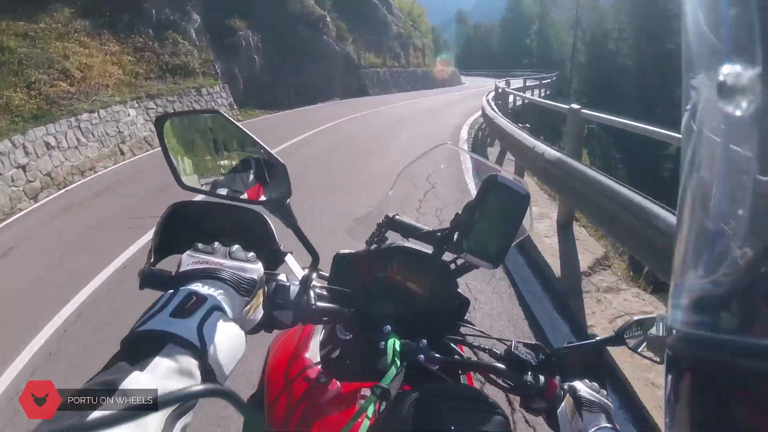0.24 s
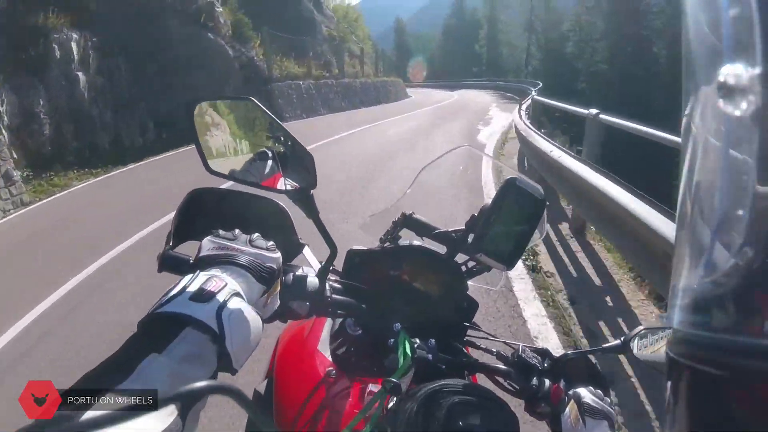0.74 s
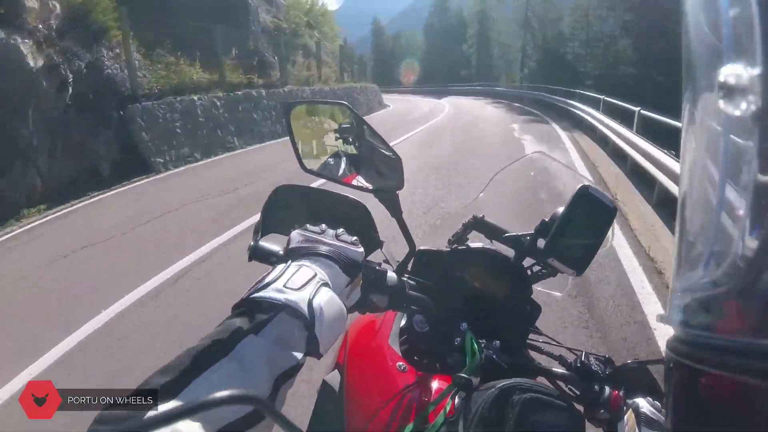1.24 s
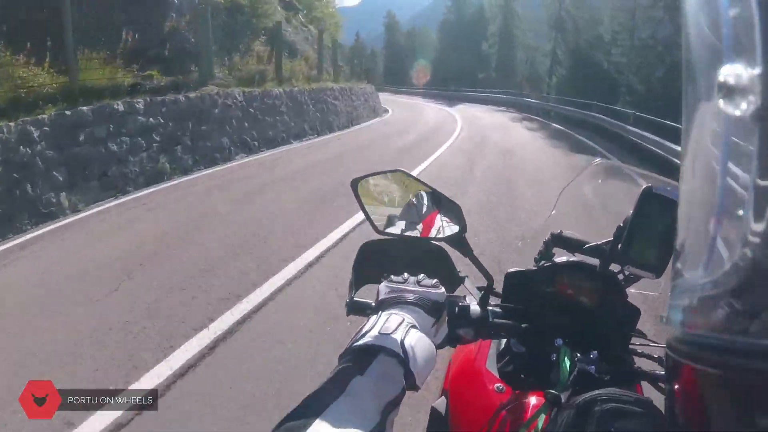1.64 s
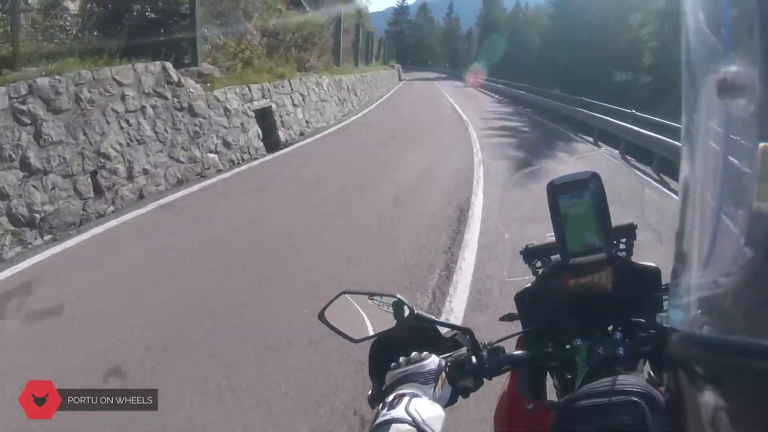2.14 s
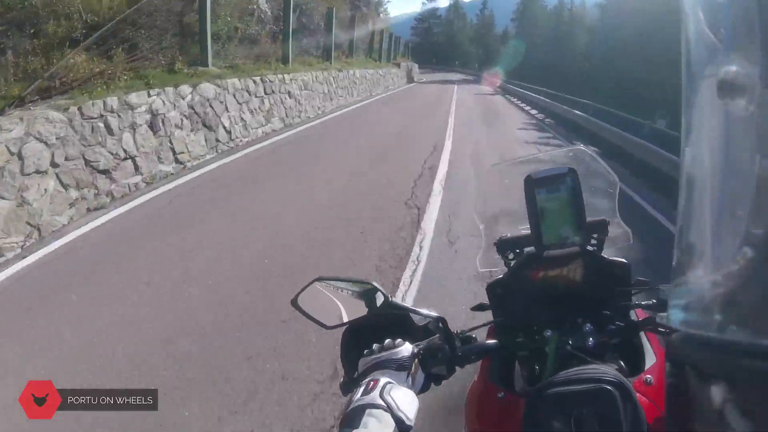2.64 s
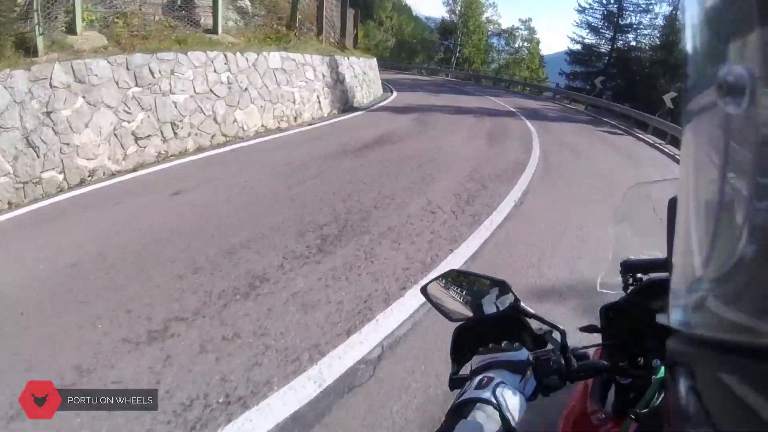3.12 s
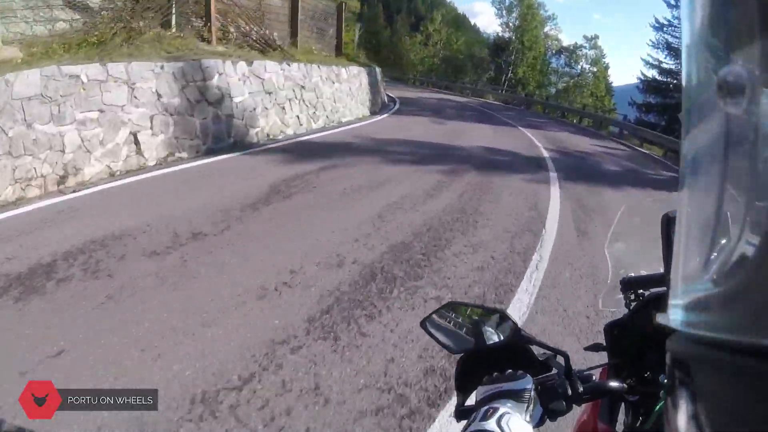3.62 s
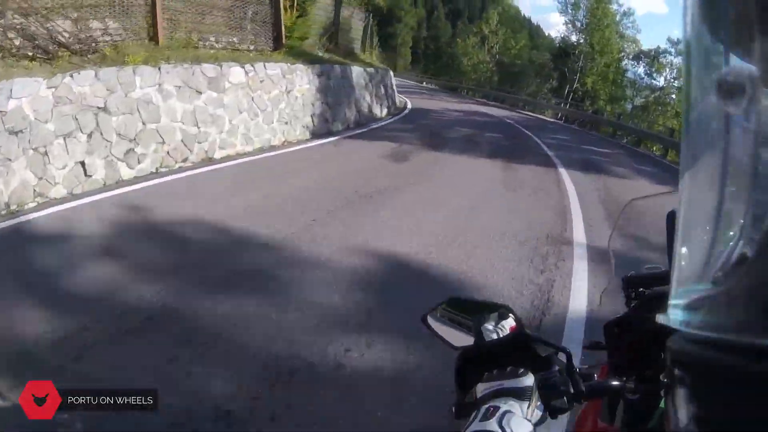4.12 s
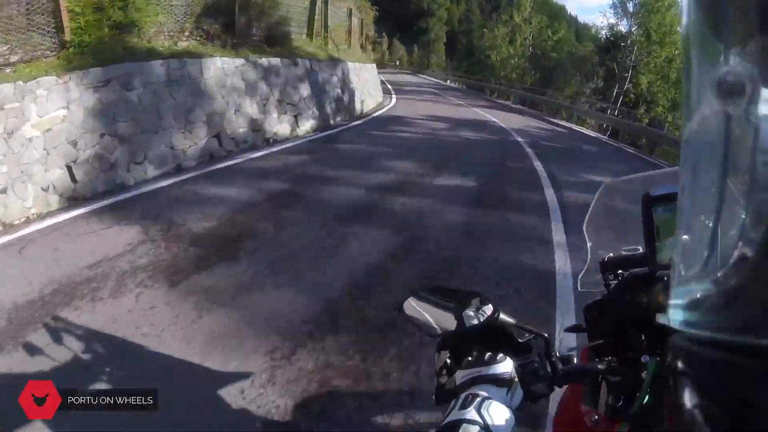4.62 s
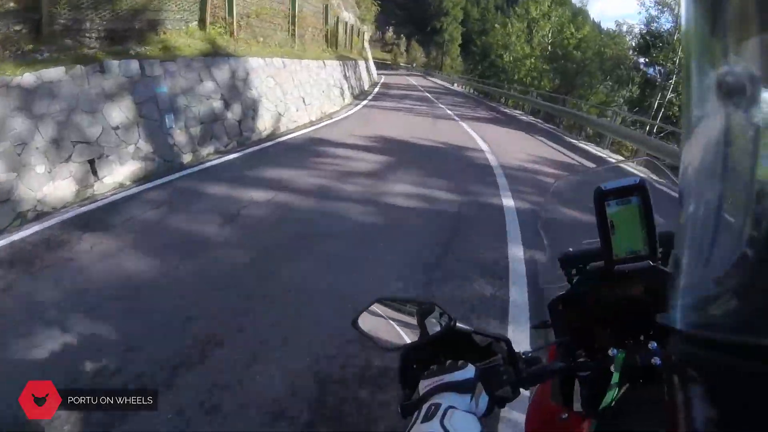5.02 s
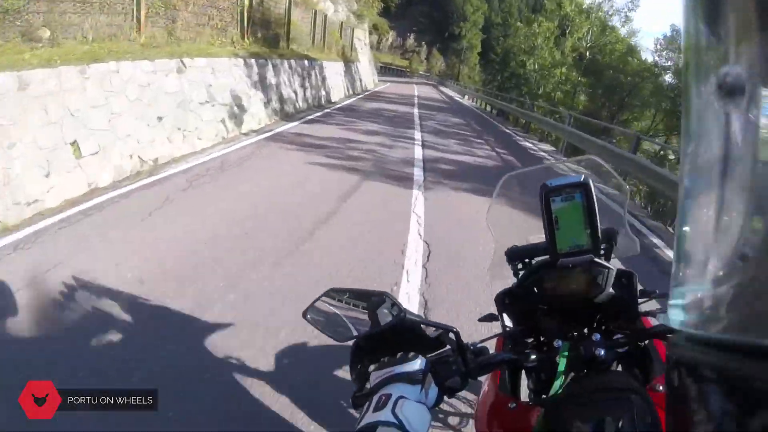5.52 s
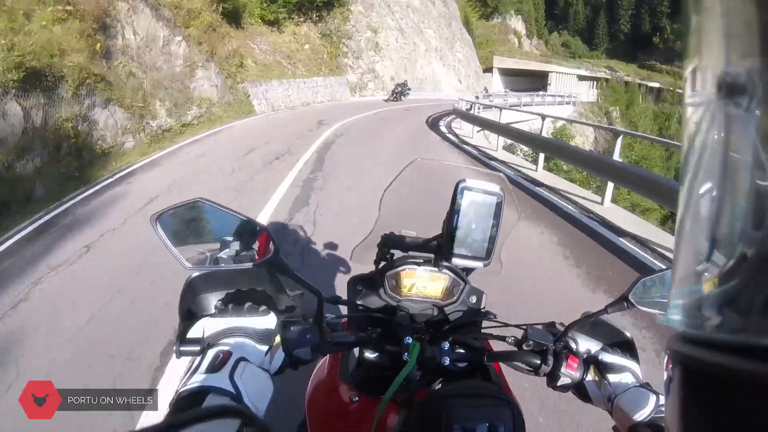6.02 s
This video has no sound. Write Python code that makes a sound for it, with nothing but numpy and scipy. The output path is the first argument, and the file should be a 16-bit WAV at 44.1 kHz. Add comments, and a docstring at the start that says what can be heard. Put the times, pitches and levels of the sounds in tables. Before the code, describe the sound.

A close, bass-heavy, muffled microphone on the rider hears a twin-cylinder motorcycle on an open mountain road. At 0 s the exhaust burbles low and uneven, with a heavy thump near 0.1 s and small bright ticks at about 0.3 and 0.8 s. From 0.5 s it smooths into a booming drone, growing raspier toward 1.6 s, then loosening. A cut at 1.9 s jumps to higher revs: popping firings, then raspy acceleration, a wind gust around 2.4 s, and lumpy deceleration pops from 2.7 s. After the cut at 2.95 s, a strong pop leads into steady droning with barking edge, faint wavering gear whine and wind swelling near 4 s; isolated pops come around 5 s as revs climb. At 5.7 s the engine abruptly drops to a deep, loping burble with irregular pops, quick ticks near 6.05 s and a faint closing hiss, ending mid-ride around 6.2 s.

```python
"""The uneven booming of a twin-cylinder motorcycle on a mountain road, from a muffled microphone on the rider.
Firings and turbulent gas ring the exhaust's boom, drone, bark, throat and rasp; strong single firings stand out.
Wind noise rumbles and buffets at the microphone port, noise bands hiss for the valve gear, gear tones whine
and bright bursts tick close by. The ride is cut in four stretches; the wave jumps at each cut."""
import sys
import numpy as np
from scipy import signal
from scipy.io import wavfile
from scipy.ndimage import uniform_filter1d

SR = 44100
rng = np.random.default_rng(int(sys.argv[2]) if len(sys.argv) > 2 else 0)


def materialize(psi):
    """Save the field psi as 16-bit PCM at rate SR to the path in sys.argv[1].

    A 1-D psi becomes a single channel; in a 2-D psi each row is a channel.
    """
    bounded = np.clip(np.atleast_2d(psi).T, -1, 1)
    quanta = np.round(bounded * 32767).astype(np.int16)
    wavfile.write(sys.argv[1], SR, quanta)


N = 276066


def from_db(db):
    """Decibels to gain."""
    return 10 ** (np.asarray(db) / 20)


def rms_one(x):
    """Scaled to rms 1."""
    return x / np.sqrt(np.mean(x ** 2) + 1e-20)


def evened(x, seconds=0.15):
    """Running rms held at 1, so that a level curve alone sets the loudness."""
    return x / np.sqrt(uniform_filter1d(x ** 2, int(seconds * SR)) + 1e-20)


def drift(rate_hz):
    """Slow random wander of spread 1: noise through a two-pole low-pass, drawn at every 40th sample."""
    r = np.exp(-80 * np.pi * rate_hz / SR)
    noise = rng.standard_normal(N // 40 + 2002)
    slow = signal.lfilter([1], [1, -2 * r, r * r], noise)[2000:]
    return np.interp(np.arange(N) / 40, np.arange(len(slow)), rms_one(slow))


def resonate(x, modes, order=2):
    """Parallel resonances with alternating signs, each passed `order` times for dark valleys."""
    out = 0
    for k, (hz, width_hz, db) in enumerate(modes):
        r, y = np.exp(-np.pi * width_hz / SR), x + 1e-18
        zeros = np.array([1, 0, -1]) * (1 - r * r) / 2
        poles = [1, -2 * r * np.cos(2 * np.pi * hz / SR), r * r]
        for _ in range(order):
            y = signal.lfilter(zeros, poles, y)
        out = out + (-1) ** k * from_db(db) * y
    return out


def banded_noise(spectrum, patchy_db):
    """Third-octave bands of noise, each with its own level and flicker; rms 1."""
    hz, db = np.transpose(spectrum)
    edges = hz[0] * 2 ** np.arange(0, np.log2(hz[-1] / hz[0]), 1 / 3)
    out, together, white = 0, drift(2.5), rng.standard_normal((2, N))
    for k, (low, high) in enumerate(zip(edges, edges[1:])):
        sos = signal.butter(2, [low, high], "band", fs=SR, output="sos")
        band = signal.sosfilt(sos, white[k % 2])
        level_db = np.interp(np.log(low * high) / 2, np.log(hz), db)
        flicker_db = patchy_db * (0.076 * together + drift(19))
        out = out + from_db(level_db + flicker_db) * band
    return rms_one(out)


# Where one stretch of the ride meets the next. Each row: time in seconds, jump of the wave (-1 to 1).
JOINS = [(1.8696, -.1), (2.9496, .24), (5.6896, .07)]


def joins():
    """At a cut the wave jumps at once and settles within a few milliseconds."""
    steps = np.zeros(N)
    for s, jump in JOINS:
        steps[round(s * SR)] = jump
    return signal.lfilter([1], [1, -np.exp(-1 / (.0015 * SR))], steps + 1e-18)


def stretch_numbers():
    """Which stretch of the ride each sample belongs to, from 0."""
    return np.searchsorted([s for s, jump in JOINS], np.arange(N) / SR)


def by_stretch(rows):
    """Each row holds from one join to the next."""
    return np.array(rows)[stretch_numbers()].T


def in_time(tables):
    """Each table's columns are drawn as lines in time, from one join to the next."""
    t, stretch = np.arange(N) / SR, stretch_numbers()
    out = np.zeros((len(tables[0][0]) - 1, N))
    for k, rows in enumerate(tables):
        here = stretch == k
        s, *columns = np.transpose(rows)
        out[:, here] = [np.interp(t[here], s, c) for c in columns]
    return out


def side_hiss():
    """Faint band of noise, opposite in the two channels."""
    sos = signal.butter(6, [4000, 11500], "band", fs=SR, output="sos")
    hiss = signal.sosfilt(sos, rng.standard_normal(N))
    return from_db(-83.5) * rms_one(hiss) * np.array([[1], [-1]])


# Broad band of the closing hiss. Each row: centre in Hz, width of one filter pass in Hz, level in dB.
SWELL_BAND = [(5200, 2800, 0)]
SWELL_START_S, SWELL_RISE_S, SWELL_DB = 6.05, .1, -72


def swell():
    """A bright hiss fades in near the end: noise in one broad band."""
    rise = np.clip((np.arange(N) / SR - SWELL_START_S) / SWELL_RISE_S, 0, 1)
    return from_db(SWELL_DB) * rise ** 2 * rms_one(resonate(rng.standard_normal(N), SWELL_BAND))


# Ticks close to the microphone. Each row: start in seconds, peak in dB, pitch in Hz,
# width of one filter pass in Hz.
TICKS = [(0.145, -66, 8100, 5040), (0.331, -45.5, 7900, 6050), (0.7766, -50, 6870, 4970),
         (3.3443, -61, 7000, 4030), (5.0883, -56, 6900, 5000), (6.053, -51, 6330, 3020),
         (6.0634, -54, 4340, 2000), (6.0824, -70, 9000, 4000)]


def ticks():
    """Each tick is a burst of bright noise that dies away within ten milliseconds."""
    out, t = np.zeros(N), np.arange(SR // 100) / SR
    for s, db, hz, width_hz in TICKS:
        decaying = rng.standard_normal(len(t)) * np.exp(-t / 0.0025)
        burst = resonate(decaying, [(hz, width_hz, 0)])
        i = round(s * SR)
        out[i:i + len(t)] += from_db(db) * burst / np.abs(burst).max()
    return out


# Wind rumble at the microphone port, one table per stretch. Each row: time in seconds, rumble rms in dB.
RUMBLE_LEVEL = [
    [(0, -40), (.3, -40.5), (.8, -38.5), (1.45, -34.5), (1.7, -29), (1.85, -42)],
    [(1.89, -37), (2.3, -36.5), (2.41, -25), (2.5, -31), (2.75, -30.5), (2.88, -30.5)],
    [(2.96, -39.5), (3.25, -38), (3.7, -38.5), (4.05, -32), (4.4, -36.5), (5.15, -36), (5.67, -37)],
    [(5.71, -32.5), (6.24, -36.5)],
]
# Colour of the rumble. Each row: frequency in Hz, relative density in dB per Hz.
RUMBLE_SPECTRUM = [(15, -35.5), (28, -12), (45, -13), (65, -7), (85, -2), (115, 1.5), (165, -15.5)]
# Colour of the buffeting. Each row: frequency in Hz, relative density in dB per Hz.
BUFFET_SPECTRUM = [(55, -34), (85, -20), (120, -5), (170, -4.5), (240, -3), (330, -16.5), (450, -18),
                   (700, -38)]
# Buffeting in calm air, one value per stretch: rms in dB.
BUFFET_CALM_DB = [-34, -32, -35, -35]
CALM_DB, BUFFET_FOLLOWS = -40, 0.49     # rumble in calm air; share of the rumble's swing, in dB per dB


def wind():
    """Turbulent air at the port: low rumble, and higher buffeting that follows the same gusts less."""
    (rumble_db,) = in_time(RUMBLE_LEVEL)
    buffet_db = by_stretch(BUFFET_CALM_DB) + BUFFET_FOLLOWS * (rumble_db - CALM_DB)
    buffeting = from_db(buffet_db) * banded_noise(BUFFET_SPECTRUM, patchy_db=1.2)
    return from_db(rumble_db) * banded_noise(RUMBLE_SPECTRUM, patchy_db=2.0) + buffeting


# Colour of the bright hiss. Each row: frequency in Hz, relative density in dB per Hz.
TREBLE_SPECTRUM = [(2500, 1.5), (3300, 9), (4300, -7), (5200, -9.5), (8000, -10), (11000, -18),
                   (14000, -52.5)]


def treble(puff, cruise_db, load_db):
    """Bright noise, swelling a little with each gas puff and with load."""
    hiss = evened((1 + .08 * puff) * banded_noise(TREBLE_SPECTRUM, patchy_db=1.0))
    return from_db(cruise_db + 0.34 * load_db) * hiss


# Colour of the valve gear. Each row: frequency in Hz, relative density in dB per Hz.
VALVE_SPECTRUM = [(500, 5.5), (900, -0.5), (1300, -4.5), (2100, -10), (2550, -16.5), (3000, -40),
                  (3400, -30.5), (5000, -36.5)]
THROB, THROB_FOLLOWS = .45, .6      # throb depth at cruising load; its growth in dB per dB of load


def valve_gear(puff, cruise_db, load_db):
    """The valve gear hisses, throbbing with each firing and more so under load."""
    throb = 1 + THROB * from_db(THROB_FOLLOWS * load_db) * puff
    hiss = evened(throb * banded_noise(VALVE_SPECTRUM, patchy_db=0.24))
    return from_db(cruise_db + 0.18 * load_db) * hiss


def mesh_tone(per_s, teeth):
    """A tone on a multiple of the cycle rate, wavering in pitch and strength."""
    hz = teeth * per_s * (1 + 0.0022 * drift(17))
    return from_db(0.53 * drift(23)) * np.sin(2 * np.pi * np.cumsum(hz) / SR)


# Gear tones that sing out for a while. Each row: start in seconds, end in seconds, multiple of the cycle rate.
GEAR_TONES = [(.9, 1.8, 91.5), (1.9, 2.75, 68), (2.05, 2.4, 72), (2.45, 2.65, 94), (2.97, 3.35, 68),
              (3.05, 3.35, 72), (3.3, 4.95, 76), (3.45, 4.15, 70), (3.9, 5.1, 68), (4.75, 5.1, 72),
              (5.2, 5.68, 67), (5.3, 5.68, 71.5), (5.35, 5.68, 74), (5.8, 6.2, 92)]
# One value per gear tone: peak level in dB, around which it wavers.
GEAR_TONES_DB = [-71, -64, -62, -72, -64, -65, -64, -61, -61, -62, -61, -63, -64, -73]
# Gear case ringing. Each row: mode in Hz, width of one filter pass in Hz, relative level in dB.
CASE_MODES = [(2490, 450, -0.5), (2860, 330, -4.5)]
TONE_FADE_S, THIN_WHINE = .08, 135      # fade in and out; the steady whine's multiple of the cycle rate
TAP_SHARE = .9      # once-a-cycle tap of the valve gear on the case, against its noise


def gears(per_s, whirr_db, thin_db):
    """Meshing teeth sing faint tones that follow the engine; the case rings with noise and a tap each cycle."""
    t, tones = np.arange(N) / SR, 0
    for (start, end, teeth), db in zip(GEAR_TONES, GEAR_TONES_DB):
        fade = np.clip(np.minimum(t - start, end - t) / TONE_FADE_S, 0, 1)
        tones = tones + from_db(db) * fade * mesh_tone(per_s, teeth)
    taps = np.diff(np.floor(np.cumsum(per_s) / SR), prepend=0)
    struck = TAP_SHARE * rms_one(taps) + rng.standard_normal(N)
    case = from_db(whirr_db) * rms_one(resonate(struck, CASE_MODES))
    return tones + from_db(thin_db) * mesh_tone(per_s, THIN_WHINE) + case


# Exhaust modes shared by pops and steady running. Each row: mode in Hz, width of one filter pass in Hz,
# relative level in dB.
DRONE = [(186, 62, 0)]
BARK = [(235.6, 64.6, 0)]
RASP = [(418.3, 110, 0.5), (631.5, 71, 2), (808, 170, -6.5), (1103, 160, -9.5), (1155, 290, -18)]
# Short boom of a pop. Each row: mode in Hz, width of one filter pass in Hz, relative level in dB.
POP_BOOM = [(115, 65, 0)]
# Strong single firings. Each row: start in seconds, thud peak in dB (before the muffling),
# rasp peak against the thud in dB, boom peak against the thud in dB.
POPS = [(0.132, -15, -11, 5.5), (0.172, -31, -2, -11), (0.202, -22.5, -0.5, -19), (1.247, -26, -20, -2),
        (1.923, -37, 17, -15), (1.98, -34, 9, -15), (2.007, -18, -5, -18), (2.042, -20, -2, -13),
        (2.067, -24, 2, -25), (2.096, -21, 0, -6), (2.29, -31, 2, -8), (2.346, -35, 0, -12),
        (2.39, -26, 5.5, -4), (2.54, -25.5, -9, -11), (2.567, -33, 4, -13), (2.619, -29, 3.5, -13),
        (2.676, -21, -22, -12), (2.709, -26, -12, -1), (2.732, -20, -17, 3.5), (2.758, -33, -7, -3),
        (2.784, -27.5, -23, 16.5), (2.815, -24.5, -13, 11.5), (2.848, -24, -20, 9), (2.87, -20, -10, 6.5),
        (2.97, -25.5, -15, 11.5), (2.999, -10, -7, -18), (3.026, -17.5, -9, -5), (4.949, -28, -4, -15),
        (5.007, -18.5, -16, -7), (5.888, -26.5, -17, -8), (5.921, -36.5, -13, 10.5), (5.948, -20.5, 3, -4),
        (6.082, -31.5, -15, 18), (6.119, -23.5, -9, 8), (6.222, -13.5, -8, -16)]


def pops():
    """A strong firing is one push, 3 ms after its onset, into the low modes, the boom and the rasp."""
    out, push = np.zeros(N), np.zeros(SR // 10)
    push[round(.003 * SR)] = 1
    rings = [resonate(push, DRONE + BARK, order=1), resonate(push, RASP, order=1), resonate(push, POP_BOOM)]
    thud, rasp, boom = (x / np.abs(x).max() for x in rings)
    for s, db, rasp_db, boom_db in POPS:
        i = round(s * SR)
        pop = from_db(db) * (thud + from_db(rasp_db) * rasp + from_db(boom_db) * boom)
        out[i:i + len(push)] -= pop[:N - i]
    return out


# Multiples of the cycle rate that sing clearly in the rasp, one value per tone.
SINGING = [14, 16, 17, 18, 19, 20, 21, 22, 23, 28, 30, 32, 34]
# One row per stretch, one column per singing tone: level against the rasp in dB, around which it wavers.
SINGING_DB = [(-14, -26, -10, -10, -24, -26, -13, -24, -26, -18, -16, -16, -30),
              (-13, -18, -7, -13, -11, -12, -14, -24, -26, -20, -20, -22, -26),
              (-8, -17, -8, -17, -22, -18, -10, -15, -16, -17, -16, -15, -24),
              (-26, -22, -26, -26, -26, -26, -26, -26, -26, -30, -30, -30, -30)]
# One value per singing tone: rise in dB per extra cycle/s.
SINGING_RISE = [0, -1, 0, -5, 0, 0, 3, 3.5, 3.5, 2, 5, 2, -4]
SINGING_PER_S = 38      # cycles per s at which the last two stretches have those levels


def singing(turns, per_s):
    """Clear upper multiples of the cycle waver in strength; in the last two stretches revs shift their levels."""
    climb = np.where(np.arange(N) / SR > JOINS[1][0], per_s - SINGING_PER_S, 0)
    out = 0
    for k, db, rise_db in zip(SINGING, by_stretch(SINGING_DB), SINGING_RISE):
        level_db = db + rise_db * climb + 2.5 * drift(4)
        out = out + from_db(level_db) * np.cos(2 * np.pi * k * turns)
    return out


SECOND_CYLINDER, SECOND_DB = .45, -15   # share of the cycle after the first firing; level against the first
SCATTER_DB, SCATTER_S = 13, .007        # spread of strength and timing at a fully uneven burn


def firings(turns, uneven):
    """Two pulses a cycle; an uneven burn scatters their strength and timing."""
    clicks, cycles = np.zeros(N), np.arange(int(turns[-1]))
    chance = np.clip(rng.standard_normal((len(cycles), 4)), -2, 2)
    for k, (share, db) in enumerate([(0, 0), (SECOND_CYLINDER, SECOND_DB)]):
        at = np.clip(np.searchsorted(turns, cycles + share), 0, N - 1)
        shift = (uneven[at] ** 2 * SCATTER_S * SR * chance[:, k]).astype(int)
        moved = np.clip(at + shift, 0, N - 1)
        clicks[moved] += from_db(db + SCATTER_DB * uneven[at] * chance[:, 2 + k])
    return clicks


PUFF_S = .002       # time constant of the gas puff's rise and fall


def gas_puffs(clicks):
    """Each firing lets out a gas puff that rises and falls smoothly."""
    fade = np.exp(-1 / (PUFF_S * SR))
    return signal.lfilter([np.e * (1 - fade)], [1, -2 * fade, fade ** 2], clicks)


def delayed(x, seconds):
    """Moved later in time, or ahead if negative."""
    return np.roll(x, round(seconds * SR))


# Exhaust levels before the muffling, one table per stretch. Each row: time in seconds, boom in dB,
# drone in dB, rasp in dB (the rasp is also the engine's load).
ENGINE = [
    [(0, -19.5, -39.5, -52.5), (.2, -24, -26.5, -56), (.34, -20, -34.5, -47), (.38, -29, -41, -57),
     (.5, -26, -32, -54), (.75, -25, -28.5, -51), (1.4, -24, -29.5, -45), (1.57, -20.5, -25.5, -41.5),
     (1.7, -34.5, -39, -44), (1.85, -24, -40, -41.5)],
    [(1.89, -31, -29.5, -42.5), (2.2, -35.5, -26.5, -36), (2.42, -41.5, -30, -35), (2.6, -41, -26, -38.5),
     (2.7, -26, -31, -37.5), (2.8, -21.5, -26.5, -43), (2.94, -28, -29, -44)],
    [(2.96, -37, -43, -46), (3.04, -34, -34, -44.5), (3.09, -30.5, -33, -48), (3.2, -46.5, -39.5, -48),
     (3.75, -41, -36.5, -44.5), (4.1, -33.5, -35.5, -43), (4.8, -54.5, -35.5, -46),
     (5.25, -49, -32.5, -40.5), (5.67, -47, -29, -40)],
    [(5.71, -26.5, -26.5, -57.5), (5.8, -27, -34.5, -55.5), (5.95, -21.5, -41, -63),
     (6.05, -25.5, -49, -58), (6.24, -27, -34, -63)],
]
# Each cut skips part of a cycle, one value per stretch: cycles ahead.
CRANK_AHEAD = [-.13, .65, .93, 1.19]
# Pipe modes: the boom, the low lope woken by an uneven burn, the throat, and the lower drone of low revs.
# Each row: mode in Hz, width of one filter pass in Hz, relative level in dB.
BOOM = [(121, 50, 3.5), (62, 110, -18)]
LOPE = [(92, 60, 0)]
THROAT = [(322, 56, 0)]
SLOW_DRONE = [(146.4, 64, -2), (203, 60, -16)]
# lope against the boom at an even burn; its rise with unevenness; unevenness at which it stops growing
LOPE_DB, LOPE_DB_PER_UNEVEN, LOPE_FULL = -25, 88, .25
THROAT_DB, RASP_NOISE = -2.5, .85       # throat over rasp; share of the rasp left to the pipe's ring
# against the bark, the drone starts ahead; boom, throat and rasp come later
DRONE_LEAD_S, BOOM_LAG_S, THROAT_LAG_S, RASP_LAG_S = .004, .003, .003, .0075


def exhaust(per_s, uneven, bark_db):
    """Firings and turbulent gas ring the pipe; each firing also puffs out gas noise for the rasp."""
    boom_db, drone_db, rasp_db = in_time(ENGINE)
    turns = np.cumsum(per_s) / SR + by_stretch(CRANK_AHEAD)
    clicks = firings(turns, uneven)
    puff = gas_puffs(clicks)
    gas, beats = rng.standard_normal(N), rms_one(clicks)
    thump = beats + .5 * uneven * gas
    low = beats + 1.05 * uneven * gas
    high = beats + (.12 + .4 * puff) * gas

    lope_db = LOPE_DB + LOPE_DB_PER_UNEVEN * np.minimum(uneven, LOPE_FULL)
    lope = from_db(lope_db) * evened(resonate(thump, LOPE))
    boom = delayed(evened(resonate(thump, BOOM, order=3)) + lope, BOOM_LAG_S)
    bark, throat, slow_drone = (evened(resonate(low, modes)) for modes in (BARK, THROAT, SLOW_DRONE))
    fast_drone = evened(resonate(low, DRONE, order=4))
    drone = delayed(np.where(per_s > 33, fast_drone, slow_drone), -DRONE_LEAD_S)
    throat = delayed(throat, THROAT_LAG_S)
    rasp = RASP_NOISE * evened(resonate(high, RASP)) + singing(turns, per_s)
    rasp, puff = delayed(rasp, RASP_LAG_S), delayed(puff, RASP_LAG_S)

    # neighbouring pipe modes swing in opposite sense; throat and rasp open together under load
    pipe = from_db(boom_db) * boom - from_db(drone_db) * drone + from_db(bark_db) * bark
    pipe = pipe - from_db(rasp_db + THROAT_DB) * throat + from_db(rasp_db) * rasp
    return pipe, puff


def muffled(x):
    """The silencer and the windshield take the edge off the exhaust."""
    return signal.sosfilt(signal.butter(2, 1700, fs=SR, output="sos"), x)


# Engine speed, one table per stretch. Each row: time in seconds, cycles per second.
SPEED = [
    [(0.0, 30.7), (0.132, 30.1), (0.242, 29.9), (0.422, 29.8), (0.504, 30.2), (0.668, 31.6), (0.756, 30.4),
     (1.462, 31.5), (1.85, 31.3)],
    [(1.89, 34.5), (2.612, 37.5), (2.72, 36.7), (2.796, 35.1), (2.94, 35.9)],
    [(2.96, 35.4), (3.09, 35.6), (3.31, 37.1), (3.43, 35.5), (3.68, 35.9), (4.92, 35.7), (5.19, 36.9),
     (5.3, 37.0), (5.44, 38.1), (5.67, 38.8)],
    [(5.71, 30.0), (5.75, 30.3), (6.24, 29.7)],
]
# Uneven burn, one table per stretch. Each row: time in seconds, unevenness from 0 to 1.
UNEVEN = [
    [(0, .24), (.38, .24), (.5, .08), (1.55, .08), (1.7, .33)],
    [(1.9, .08), (2.6, .08), (2.72, .34)],
    [(2.96, .36), (3.2, .2), (3.5, .12), (5.0, .12), (5.2, .07)],
    [(5.7, .24), (6.2, .28)],
]
# Levels at cruising load, one row per stretch. Each row: bark in dB (before the muffling), valve gear in dB,
# treble in dB, whirr of the gear case in dB, thin whine in dB.
STRETCHES = [(-39, -43, -69, -67, -79.5), (-33, -41, -69.5, -64, -99), (-31.5, -44, -68.5, -60.5, -96.5),
             (-31, -40.5, -67, -77, -75)]
CRUISE_DB = -44     # rasp at cruising load
BARK_FOLLOWS, WHIRR_FOLLOWS = 0.12, 0.43    # share of the load's swing, in dB per dB


def scene():
    """One microphone on the rider feeds both channels, with a faint hiss that differs between them."""
    (per_s,), (uneven,) = in_time(SPEED), in_time(UNEVEN)
    bark_db, valve_db, treble_db, whirr_db, thin_db = by_stretch(STRETCHES)
    load_db = in_time(ENGINE)[-1] - CRUISE_DB
    pipe, puff = exhaust(per_s, uneven, bark_db + BARK_FOLLOWS * load_db)
    metal = gears(per_s, whirr_db + WHIRR_FOLLOWS * load_db, thin_db)
    hisses = valve_gear(puff, valve_db, load_db) + treble(puff, treble_db, load_db)
    mid = muffled(pipe + pops()) + wind() + hisses + metal + swell() + ticks()
    return mid + side_hiss()


def record(dry):
    """Peaks are rounded, the stretches are joined, the top is cut steeply above 16.7 kHz."""
    rounded = .5 * np.tanh(dry / .5)
    steep = signal.ellip(10, .5, 70, 16700, fs=SR, output="sos")
    return signal.sosfilt(steep, rounded + joins())


dry = scene()
out = record(dry)
materialize(out)
```